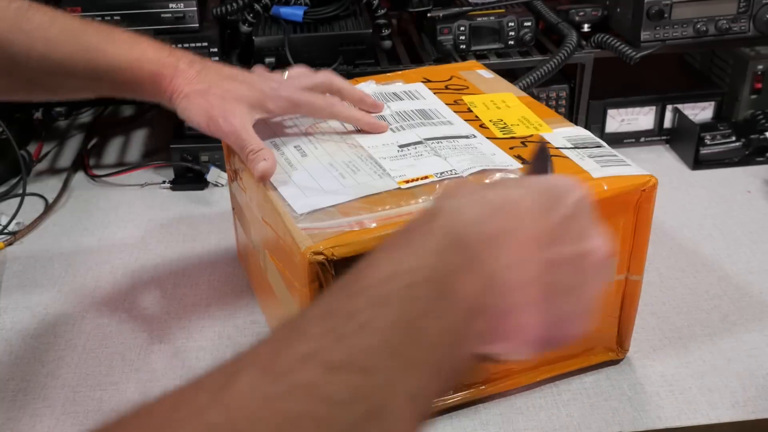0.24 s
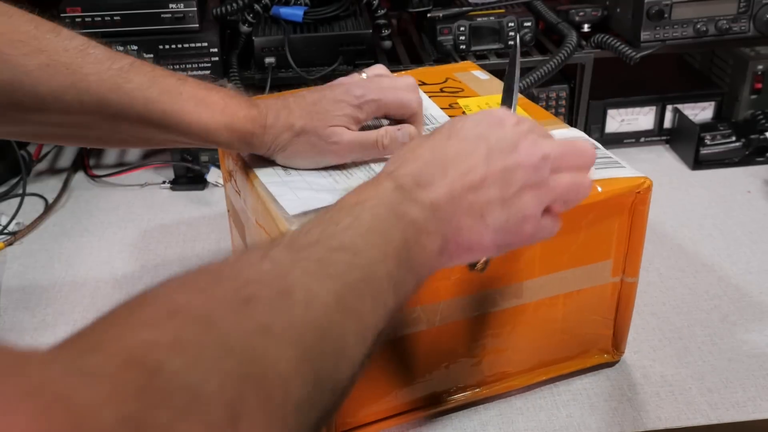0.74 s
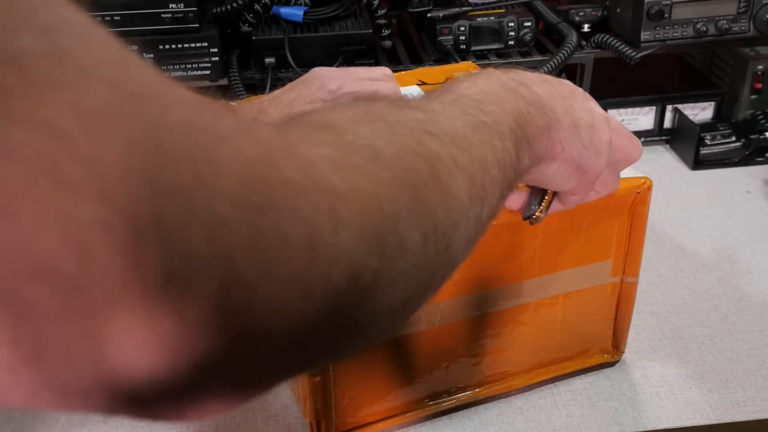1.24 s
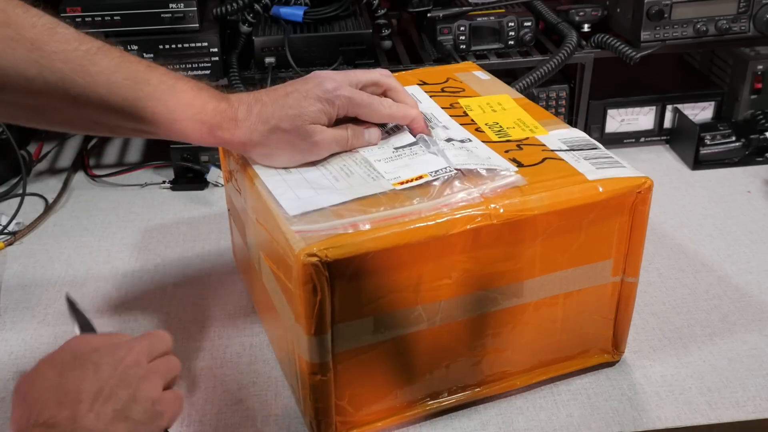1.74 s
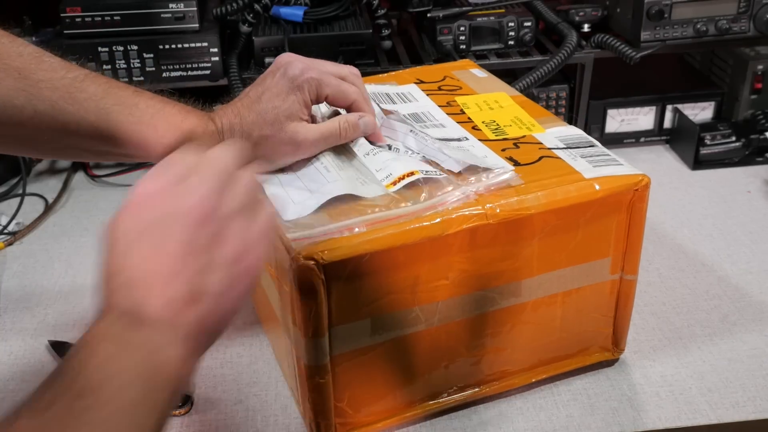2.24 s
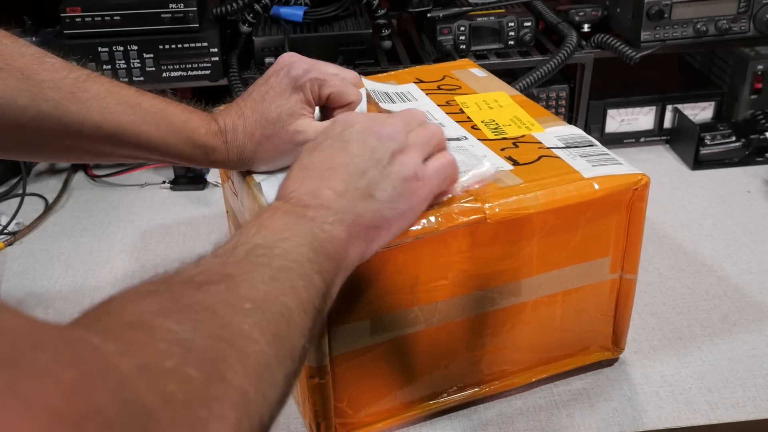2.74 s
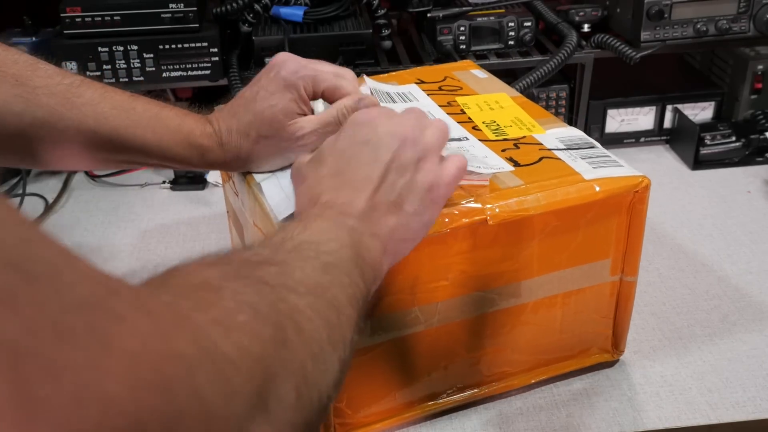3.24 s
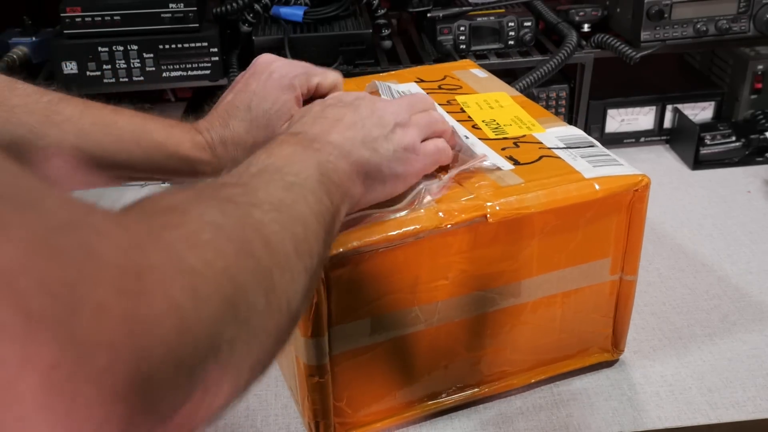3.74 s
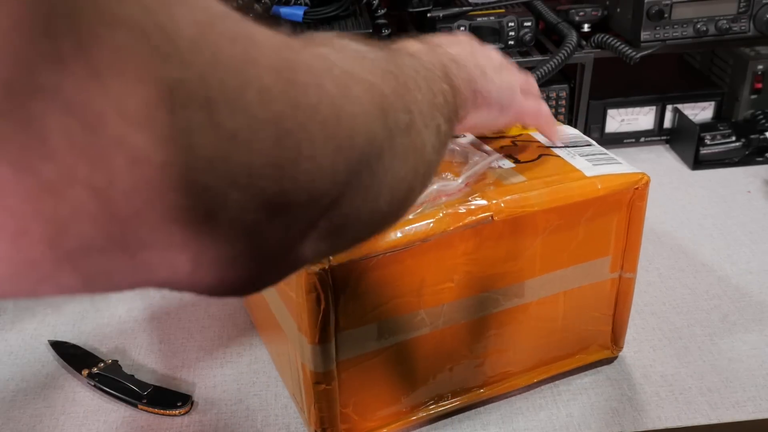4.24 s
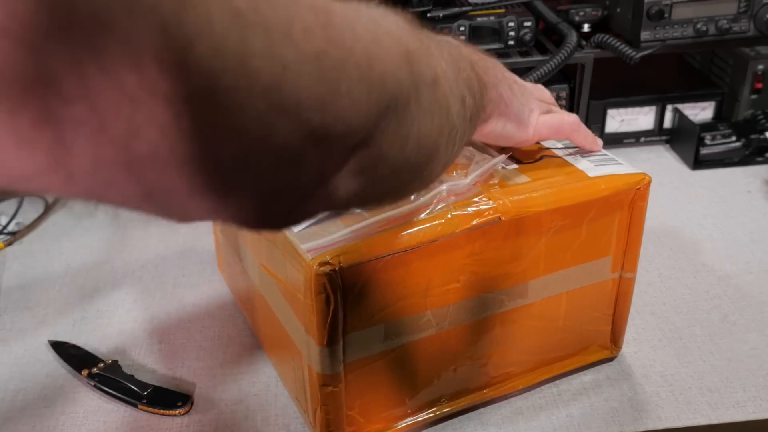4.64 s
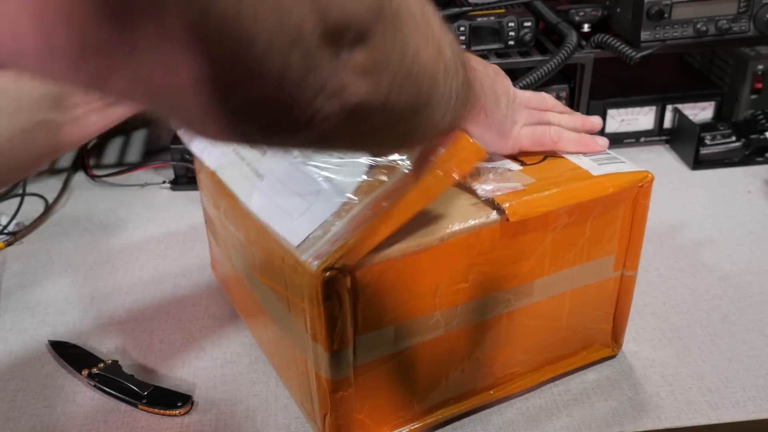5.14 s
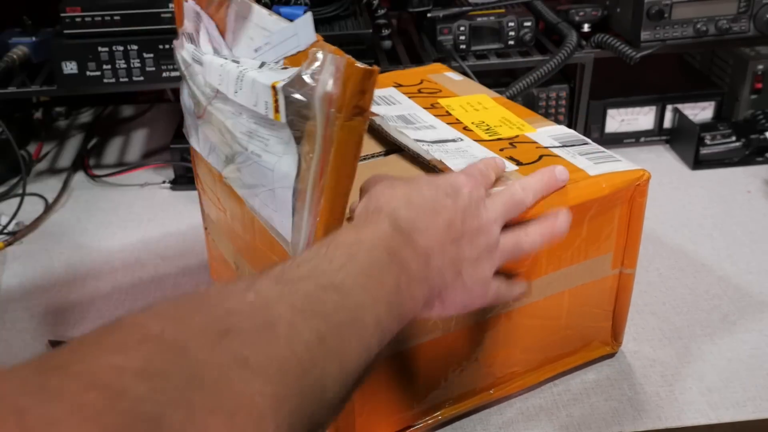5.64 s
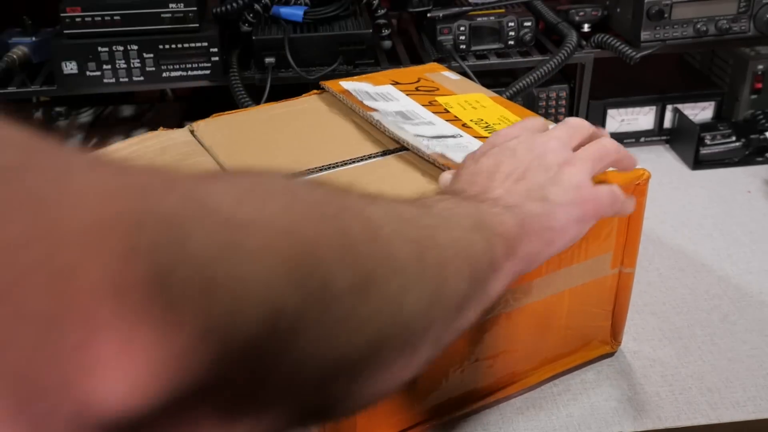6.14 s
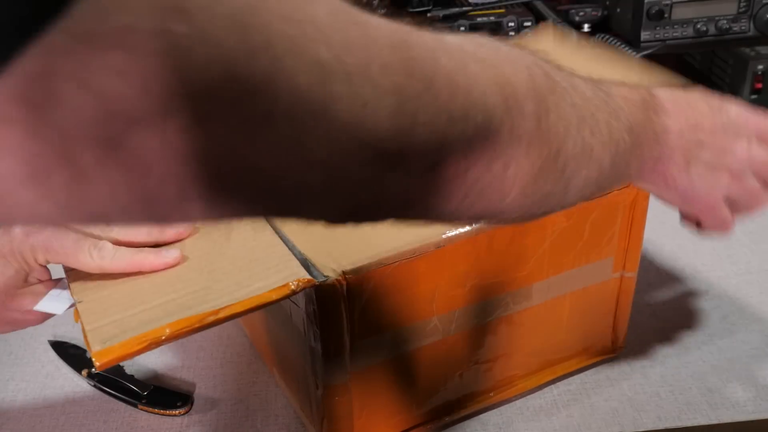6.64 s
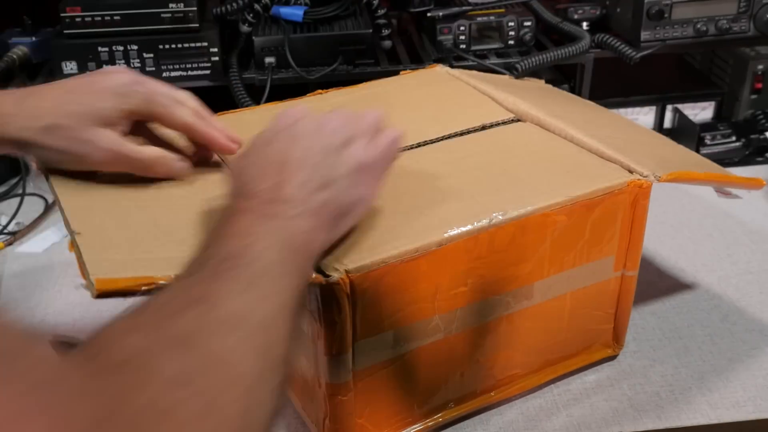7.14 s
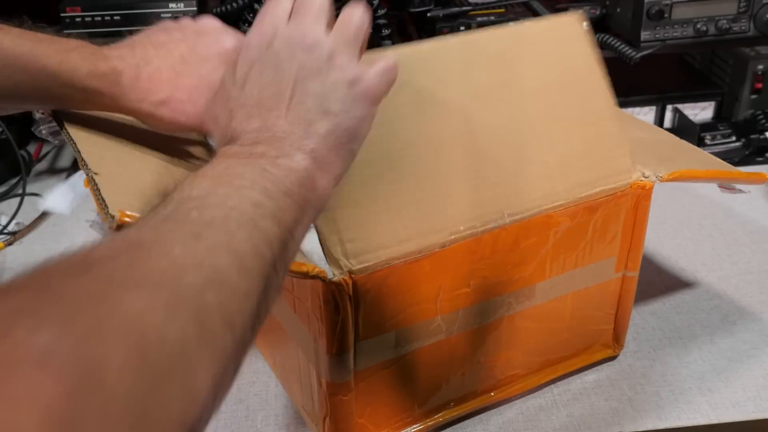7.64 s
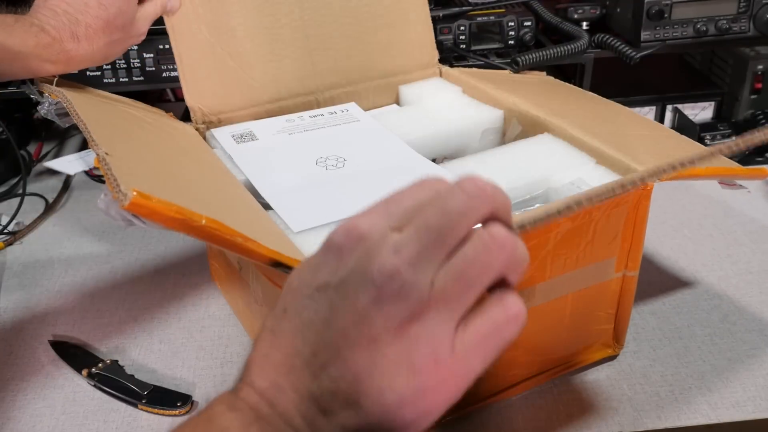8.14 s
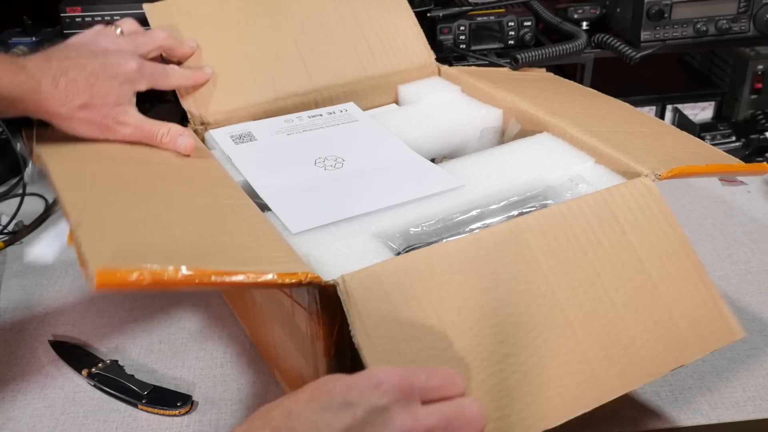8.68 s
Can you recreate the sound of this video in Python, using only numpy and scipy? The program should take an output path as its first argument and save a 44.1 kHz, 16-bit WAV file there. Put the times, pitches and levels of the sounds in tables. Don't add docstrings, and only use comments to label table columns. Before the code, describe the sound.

Over a low wavering fan with faint mains hum, a parcel is slit and pulled apart close to a small camera microphone. Bright plastic pops and dry ticks mix with paper scrapes and boxy knocks. Snaps cluster thickly in the middle, board cracks loudly as the lid rips, then the action eases into smooth film hiss and cardboard rubbing. Small room, short tail.

```python
import sys
import numpy as np
from scipy import signal
from scipy.fft import rfft, irfft, next_fast_len
from scipy.io import wavfile
from scipy.ndimage import uniform_filter1d

SR = 44100
rng = np.random.default_rng(int(sys.argv[2]) if len(sys.argv) > 2 else 0)


def makeup_ratio(level_db):
    decades = np.asarray(level_db, float) / 20
    return 10 ** decades


def materialize(psi):
    bounded = np.clip(np.atleast_2d(psi).T, -1, 1)
    quanta = np.round(bounded * 32767).astype(np.int16)
    wavfile.write(sys.argv[1], SR, quanta)


N = 392921
RISE_DB_S, FALL_DB_S = 697, 307
AFTER_DB_S, AFTER_SLOPE = 380, 0.99


def set_rms(x, db):
    return x * makeup_ratio(db) / np.sqrt(np.mean(x ** 2))


def colour(x, spectrum):
    size = next_fast_len(x.shape[-1])
    hz, db = np.transpose(spectrum)
    bin_hz = np.arange(size // 2 + 1) * SR / size
    gain = makeup_ratio(np.interp(np.log(bin_hz + 1), np.log(hz), db))
    return irfft(rfft(x, size) * gain, size)[..., :x.shape[-1]]


def ring(x, hz, width_hz):
    return signal.lfilter(*signal.iirpeak(min(hz, .45 * SR), hz / width_hz, fs=SR), x)


def modes(push, table, detune):
    total = 0
    for k, (hz, width_hz, db) in enumerate(table):
        total = total + (-1) ** k * makeup_ratio(db) * ring(push, hz * (1 + detune[k]), width_hz)
    return total


def knock(noise, decay_s):
    i = np.arange(len(noise))
    return 2.8 * (i == 0) + 0.42 * noise * np.exp(-i / SR / decay_s)


def swing(t, hz, rise_s, t60_s):
    return (1 - np.exp(-t / rise_s)) * np.exp(-np.log(1000) * t / t60_s) * np.sin(2 * np.pi * hz * t)


def place(out, s, sound, peak_db):
    i = int(s * SR)
    sound = sound[:N - i] * makeup_ratio(peak_db) / np.max(np.abs(sound))
    out[i:i + len(sound)] += sound


def walk(rate_hz):
    k = int(SR / rate_hz)
    held = np.repeat(rng.standard_normal(N // k + 1), k)
    return 1.5 * uniform_filter1d(uniform_filter1d(held, k), k)[:N]


def curve(table):
    s, *columns = np.transpose(table)
    return [np.interp(np.arange(N) / SR, s, column) for column in columns]


def combine(a_db, b_db):
    return 10 * np.log10(makeup_ratio(2 * a_db) + makeup_ratio(2 * b_db))


def strokes(rows, rest_db, rise_db_s, fall_db_s):
    t = np.arange(0, N / SR + .01, .001)
    s, hold_s, db = np.transpose(rows)[:, :, None]
    rising = rise_db_s * np.maximum(s - t, 0)
    falling = fall_db_s * np.maximum(t - s - hold_s, 0)
    power = np.sum(makeup_ratio(2 * (db - rising - falling)), axis=0) + makeup_ratio(2 * rest_db)
    return np.interp(np.arange(N) / SR, t, 10 * np.log10(power))


def settling(s, peak_db, rel_db):
    start, hit_db = np.asarray(s), np.asarray(peak_db)
    rows = np.transpose([start, 0 * start, AFTER_SLOPE * hit_db + rel_db])
    return strokes(rows, -99, 9000, AFTER_DB_S)


def grit(rate_hz, spread_db, flicker_db):
    size_db = spread_db * np.minimum(rng.exponential(size=N), 5)
    slips = (rng.random(N) < rate_hz / SR) * rng.standard_normal(N) * makeup_ratio(size_db)
    return slips * makeup_ratio(flicker_db * walk(40))


def two_ports(x):
    return np.array([x, np.roll(x, 333)])


def rustle(rate_hz, spread_db, flicker_db, spectrum, db):
    return two_ports(set_rms(colour(grit(rate_hz, spread_db, flicker_db), spectrum), 0)) * makeup_ratio(db)


# (frequency [Hz], level [dB])
PORT_WIDTH = [(100, -35), (350, -23.5), (700, -5.5), (1400, -1), (3000, -2.5), (12000, -6)]


def spread(mid, side):
    side = colour(side, PORT_WIDTH)
    return np.array([mid + side, mid - side])


# (frequency [Hz], density [dB per Hz])
FAN_AIR = [(18, -58), (30, -40), (106, -5.5), (245, 6), (512, 0), (844, -5.5), (1600, -21), (3870, -59),
           (7870, -45), (10800, -42), (14800, -78), (16000, -45)]
# (frequency [Hz], rms level [dB])
FAN_LINES = [(116.5, -63), (120, -59.5), (242, -62), (754, -67), (813, -64), (872, -62.5), (928, -70),
             (985, -65), (1163, -66)]


def fan():
    t = np.arange(N) / SR
    air = colour(rng.standard_normal((2, N)), FAN_AIR) * makeup_ratio(walk(5.05))
    lines = 0
    for hz, db in FAN_LINES:
        lines = lines + makeup_ratio(db + walk(2)) * np.sqrt(2) * np.sin(2 * np.pi * (hz * t + rng.random()))
    return set_rms(spread(*air), -52.5) + lines


def room(x, count=12):
    desk_s, desk_db = 0.0033, -2
    t60_s, tail_db = 0.092, -6
    t, step = np.arange(int(.3 * SR)) / SR, N // count + 1
    out = np.zeros((2, N + step + len(t)))
    for i in range(0, N, step):
        tail = rng.standard_normal((2, len(t))) * np.exp(-np.log(1000) * t / t60_s) * (t > desk_s)
        tail = colour(tail, [(150, -7), (800, 5), (4000, 8), (16000, -8)])
        response = spread(*tail) * makeup_ratio(tail_db) / np.sqrt(np.sum(tail[0] ** 2))
        response[:, 0] += 1
        response[:, int(desk_s * SR)] += makeup_ratio(desk_db)
        heard = signal.oaconvolve(x[None, i:i + step], response, axes=1)
        out[:, i:i + heard.shape[1]] += heard
    return out[:, :N]


# (time [s], left minus right [dB])
HAND_PAN = [(0, 1), (3, 0.6), (4, 0), (5.3, 0.5), (5.75, 2), (6.2, 0), (6.8, -1.5), (7.2, 1.5), (7.7, 2),
            (8.91, 2)]


def pan_gain():
    pan_db = curve(HAND_PAN)[0]
    return makeup_ratio([pan_db / 2, -pan_db / 2])


# (time [s], peak [dB], wall [Hz], whole box re peak [dB])
BOX_THUMPS = [(.0522, -16.5, 564, -4.5), (.06, -16.5, 400, -2.5), (.657, -36, 287, 2),
              (.735, -25.5, 315, -7), (0.8043, -14, 319, -9), (1.009, -33, 362, 0), (1.229, -32.5, 286, -3),
              (1.645, -28.5, 266, -4), (1.955, -36, 350, -2), (2.109, -19, 870, -32),
              (2.118, -12.5, 846, -14), (2.181, -13, 927, -30), (1.98, -33, 890, -19),
              (7.458, -35, 400, -3), (3.579, -37, 397, -7), (4.186, -34, 303, -6), (8.248, -39, 450, -3),
              (4.623, -36.5, 400.3, 0.5), (4.949, -25.5, 656, -7), (5.056, -17.5, 682, -10),
              (5.096, -14.5, 396, 3.5), (5.524, -32.5, 350, -0.5), (5.959, -34, 375, 2.5),
              (6.373, -29, 730, -12), (6.373, -24, 1350, -28), (6.741, -38, 1415, -28),
              (6.828, -40, 1660, -30), (7.71, -38, 1287, -30), (3.566, -26, 1246, -30),
              (3.579, -25, 1254, -30), (0.056, -22, 1090, -32), (6.74, -21.5, 460, -27),
              (7.213, -36, 546, -5), (7.305, -35, 360, -15), (7.543, -27, 177, -6),
              (7.541, -26.5, 609, 1.5)]
# (frequency [Hz], width [Hz], gain [dB])
BOX_MODES = [(165, 28, 5), (250, 130, 1.5), (404, 150, 5), (624, 84, 9.5), (654, 320, -5)]


def thumps():
    out, t = np.zeros(N), np.arange(6000) / SR
    for s, db, hz, box_db in BOX_THUMPS:
        noise = rng.standard_normal(6000)
        place(out, s, swing(t, hz, 0.002, 0.073), db - 2)
        place(out, s, modes(knock(noise, 0.0053), BOX_MODES, 0.032 * noise), db + box_db + 4)
    return out


# (time [s], peak [dB], tone [Hz])
FLAP_SLAPS = [(4.978, -27, 300), (5.0595, -14, 750), (5.0868, -6.5, 700), (5.0958, -1.5, 460),
              (5.288, -29, 390), (5.373, -29, 403), (3.787, -38, 494), (2.761, -30, 554),
              (2.795, -30.5, 646), (2.947, -35, 600), (2.991, -31, 660), (3.093, -35, 361),
              (3.284, -34, 375), (3.519, -35, 549), (3.579, -28, 470), (4.011, -38, 400),
              (4.38, -35.5, 430), (4.49, -31, 754), (4.516, -33.5, 440), (6.998, -36, 230),
              (7.03, -35, 560), (7.05, -38, 560), (6.949, -44, 620), (7.247, -39, 400), (7.4, -33, 370),
              (7.412, -33, 360), (7.43, -34, 300), (7.2, -38, 540), (7.32, -34, 400), (.8035, -16.5, 496),
              (0.82, -31, 730), (6.374, -23, 1180), (7.542, -33, 1320), (3.053, -36, 310),
              (3.166, -38, 350), (3.108, -31, 1200), (4.9815, -23.5, 520)]


def slaps():
    out, t = np.zeros(N), np.arange(3000) / SR
    for s, db, hz in FLAP_SLAPS:
        place(out, s, swing(t, hz, 0.00067, 0.018), db)
    return out


# (start [s], hold [s], level [dB])
PALM_PRESSES = [
    (1.94, 0.077, -49),
    (2.2, 0.13, -35.5),
    (5.3, 0.078, -41.5),
    (6.65, .2, -58),
    (6.96, 0.1, -48),
    (7.2, .03, -51),
    (7.4, 0.045, -47),
    (7.66, .08, -49),
]
# (frequency [Hz], density [dB per Hz])
BOX_DRONE = [(100, -6.5), (200, 1), (400, 5), (900, -0.5), (1300, -5.5), (2000, -11.5), (3500, -16.5),
             (6000, -47)]


def body(paper_db):
    pressed = strokes(PALM_PRESSES, -51.5, RISE_DB_S, FALL_DB_S)
    s, peak_db, _, _ = np.transpose(BOX_THUMPS)
    shaken = settling(s, peak_db, -14.5)
    return rustle(5000, 1, 1, BOX_DRONE, combine(combine(pressed, shaken), paper_db - 7))


# (start [s], hold [s], level [dB])
FLAP_SCUFFS = [
    (5.83, 0.04, -40),
    (6.27, 0.048, -44.5),
    (6.82, 0.024, -53),
    (5.3, 0.041, -44),
    (7.69, 0.047, -41),
    (5.9, 0.01, -50),
    (1.9, 0.05, -53),
]
# (frequency [Hz], density [dB per Hz])
SCUFF_SPECTRUM = [(350, -30), (600, -18), (1400, -0.5), (2300, -6.5), (4500, -9.5)]


def scuffs():
    return rustle(5000, 1.5, 2, SCUFF_SPECTRUM, strokes(FLAP_SCUFFS, -99, RISE_DB_S, FALL_DB_S))


# (start [s], hold [s], film [dB], paper re film [dB])
POUCH_PEELS = [(0, 0.033, -51, 0.5), (0.253, 0.032, -48.5, -6.5), (0.29, 0.04, -64, -2.5),
               (0.556, 0.027, -64, -4), (0.63, 0.029, -48, -9), (0.707, 0.023, -46.5, -0.5),
               (0.777, 0.08, -44.5, 4.5), (0.978, 0.092, -54.5, 6.5), (1.106, .16, -51, -4),
               (1.379, 0.029, -49, -6), (1.444, .08, -61, 3), (1.569, 0.033, -55.5, 1),
               (1.654, 0.011, -42, 5.5), (1.69, .05, -58, -10), (1.76, 0.17, -61, 0.5),
               (1.947, 0.037, -53.5, 6.5), (2.047, .03, -51, 1), (2.34, 0.075, -55.5, 5),
               (2.45, 0.098, -58, 3), (2.577, 0.098, -49.5, 1.5), (2.684, 0.088, -40, -5),
               (2.8, 0.11, -46.5, -4), (2.95, 0.15, -44.5, 1), (3.285, 0.071, -38.5, -2),
               (3.15, 0.045, -53, -3), (3.363, 0.109, -44, -1.5), (3.637, 0.082, -49.5, -2),
               (3.773, 0.026, -35.5, -10.5), (3.863, 0.042, -37.5, -0.5), (3.954, 0.18, -48.5, 0),
               (4.163, 0.039, -40.5, 2.5), (4.31, 0.015, -51.5, 2.5), (4.379, 0.016, -52, 7),
               (4.48, 0.075, -57, 6), (4.617, 0.049, -48.5, 1.5), (4.69, .05, -57, 5),
               (4.751, 0.09, -46.5, -1), (4.863, 0.063, -51, -4)]
# (start [s], hold [s], film [dB], paper re film [dB])
FLAP_SLIDES = [(4.947, 0.041, -39.5, 9.5), (5.045, 0.11, -41, 8.5), (5.102, 0.051, -44, 3),
               (5.21, 0.1, -53, 9.5), (5.344, 0.023, -39.5, 3), (5.443, 0.089, -50, -0.5),
               (5.578, 0.091, -45.5, 2.5), (5.64, 0.19, -37.5, -13), (5.83, 0.017, -29.5, -15),
               (5.883, 0.088, -40, -5), (6.016, 0.07, -43.5, -5.5), (6.088, 0.068, -49.5, -3),
               (6.163, 0.058, -50.5, 1), (6.53, 0.055, -52, -3), (6.86, 0.08, -57, -1),
               (6.321, 0.016, -37, 0.5), (6.456, 0.061, -43, 0), (6.599, 0.089, -37.5, -7),
               (6.72, 0.048, -42.5, -4), (6.824, 0.016, -48.5, 8), (6.946, 0.08, -41, -3.5),
               (7.106, 0.033, -42, -20), (7.174, 0.12, -36.5, -15), (7.335, 0.11, -43, -7.5),
               (7.473, 0.096, -53, 0), (7.6, 0.068, -50.5, 1), (7.713, 0.044, -41, -8),
               (7.78, 0.055, -52, -3), (7.859, 0.075, -42.5, -10), (7.954, 0.14, -48.5, -6.5),
               (8.172, 0.098, -49.5, -1), (8.308, 0.015, -39.5, -17), (8.377, 0.014, -40.5, -15),
               (8.43, 0.18, -41, -14), (8.664, 0.029, -47.5, -4), (8.772, 0.13, -46, -6.5)]


def hands():
    s, hold_s, film_db, paper_rel_db = np.transpose(POUCH_PEELS + FLAP_SLIDES)
    snap_s, peak_db, _, _, film_after_db, paper_after_db = np.transpose(releases())
    film_rows = np.transpose([s, hold_s, film_db])
    paper_rows = np.transpose([s, hold_s, film_db + paper_rel_db])
    film = strokes(film_rows, -62, RISE_DB_S, FALL_DB_S)
    paper = strokes(paper_rows, -60, RISE_DB_S, FALL_DB_S)
    film = combine(film, settling(snap_s, peak_db, film_after_db))
    paper = combine(paper, settling(snap_s, peak_db, paper_after_db))
    return film, paper


def crackle(film_db, paper_db):
    pouch_off_s, creases_from_db = 5.55, -55
    low = ring(grit(350, 1.8, 5), 2800, 2500)
    high = ring(grit(350, 1.8, 5), 9000, 8000)
    held = np.arange(N) / SR < pouch_off_s
    force = makeup_ratio(2 * np.minimum(paper_db - creases_from_db, 0))
    paper = (set_rms(low, -6.5) + set_rms(high, -11.5)) * makeup_ratio(np.minimum(paper_db, -40))
    film = set_rms(high, -28) * makeup_ratio(np.minimum(film_db, -40))
    return held * force * (paper + film)


# (frequency [Hz], density [dB per Hz])
FILM_SPECTRUM = [(1760, -18), (3000, -13), (6810, -6.5), (7800, -8), (12100, -2.5), (15200, -1),
                 (16000, -25), (16500, -62)]
# (time [s], level [dB], hiss re level [dB])
KNIFE_CLATTER = [
    (2.086, -47, -8),
    (2.091, -23, -8),
    (2.124, -12, -8.5),
    (2.142, -15.5, -3.5),
    (2.176, -19.5, -11),
    (2.184, -12.5, -3.5),
    (2.22, -19, -19),
    (2.27, -23, -5),
    (2.35, -57, -27),
]
# (frequency [Hz], density [dB per Hz])
CLATTER_SPECTRUM = [(80, -55), (150, -25), (330, -6.5), (700, -2.5), (950, -6.5), (1300, -8.5), (5000, -21),
                    (7000, -48)]
# (frequency [Hz], width [Hz], level re clatter [dB])
LID_KNIFE_MODES = [(450, 240, -8), (880, 240, 1), (2200, 700, -14), (4100, 500, -15), (8500, 400, -16),
                   (11050, 220, -8)]


def clatter():
    clatter_db, hiss_db = curve(KNIFE_CLATTER)
    t = np.arange(N) / SR
    clatter_db = np.where((t > KNIFE_CLATTER[0][0]) & (t < KNIFE_CLATTER[-1][0]), clatter_db, -120)
    push = grit(6000, 1.6, 1.2)
    rings = 0
    for hz, width_hz, db in LID_KNIFE_MODES:
        rings = rings + set_rms(ring(ring(push, hz, width_hz), hz, 2 * width_hz), db)
    rattle = rustle(6000, 1.6, 1.2, CLATTER_SPECTRUM, clatter_db - 3)
    hiss = rustle(12000, 1.5, 2, FILM_SPECTRUM, clatter_db + hiss_db)
    return rattle + hiss + two_ports(rings * makeup_ratio(clatter_db - 7.5))


# (frequency [Hz], density [dB per Hz])
PAPER_SPECTRUM = [(600, -30), (1200, -1.5), (2500, -5.5), (4200, -4.5), (7000, -7.5)]


def rubbing(film_db, paper_db):
    film = rustle(14000, 1.5, 1.6, FILM_SPECTRUM, film_db)
    paper = rustle(4500, 2.6, 2, PAPER_SPECTRUM, paper_db)
    return spread(*(film + paper + clatter() + scuffs() + body(paper_db)))


# (time [s], peak [dB], brightest [Hz])
FILM_POPS = [(0.2808, -11.5, 7900), (0.5516, -28, 11000), (0.655, -21.5, 9600), (0.8340, 0, 6340),
             (2.049, -22, 9300), (2.3491, -15, 7800), (2.6685, -2.5, 11500), (2.6915, -12, 7000),
             (2.751, 1, 11000), (2.7644, -2.5, 4500), (2.7958, 4, 6180), (2.8537, -9, 9700),
             (3.357, -11.5, 8900), (3.4732, 1, 10600), (3.491, 2.5, 10700), (3.578, -3.5, 2200),
             (3.7471, -11.5, 8900), (4.082, -14.5, 6130), (5.2584, -8.5, 10600), (5.516, -12, 10000),
             (5.8207, -42, 3320), (6.411, -11, 6300), (6.611, -19, 7560), (6.7146, -14.5, 11100),
             (6.942, -19, 10400), (7.8594, -19.5, 3900), (8.251, -15, 8500), (8.716, -19.5, 4900),
             (8.828, -24, 9500)]
# (time [s], peak [dB], brightest [Hz])
TAPE_SNAPS = [(0.809, -12.5, 5900), (.91, -12, 3200), (1.405, -23.5, 11300), (1.6487, -12.5, 4600),
              (1.8341, -29.5, 8700), (2.0742, -19.5, 5170), (2.655, -22, 10000), (2.6649, -10.5, 8100),
              (2.9407, -21, 7700), (3.0931, -18.5, 6900), (3.1081, -14, 4000), (3.2241, -9.5, 4100),
              (3.2902, -25, 7200), (3.4674, -15, 7140), (3.5195, 1.5, 6470), (3.5293, -5, 6000),
              (3.5643, 3, 2640), (3.5964, -7, 2970), (3.876, -21, 4000), (4.205, -16, 5100),
              (4.651, -19.5, 6700), (4.6706, -37, 5300), (4.812, -20, 3850), (4.9384, -15, 2500),
              (4.9856, -9, 9100), (5.054, -6, 2800), (5.174, -18, 7340), (5.524, -9, 8400),
              (6.463, -12.5, 5950)]
# (time [s], peak [dB], brightest [Hz])
BOARD_CRACKS = [(0.0547, -1.5, 2340), (.332, -29.5, 3000), (0.766, -29, 9250), (0.7858, -15, 9000),
                (1.0278, -26, 3180), (2.0903, -12.5, 2530), (2.1815, -4.5, 1900), (2.229, -17, 3500),
                (2.262, -21, 7650), (2.9339, -20, 4460), (3.3113, -24, 3000), (3.3184, -26, 7200),
                (4.018, -27.5, 4400), (4.3755, -27.5, 3020), (4.49, -25, 1620), (4.514, -25.5, 1850),
                (4.553, -22.5, 2170), (4.6268, -21.5, 4830), (4.778, -35, 2000), (4.953, -15, 2300),
                (4.9696, -18.5, 5500), (5.0600, -2.5, 2300), (5.089, -5.5, 8250), (5.0955, -1.5, 2900),
                (5.2516, -19.5, 2300), (5.8395, -11.5, 2100), (6.3741, -4, 2500), (6.8169, -22, 4240),
                (7.54, -19, 6000)]
# (time [s], peak [dB], brightest [Hz])
FILM_TICKS = [(0.243, -40, 5060), (0.506, -35, 6000), (.6301, -38, 10700), (.7025, -27, 9000),
              (.9798, -41, 3970), (1.107, -25, 10000), (1.1784, -33, 9000), (1.2128, -33, 11900),
              (1.5535, -37, 9000), (1.6274, -31, 2910), (6.528, -35, 2500), (6.5743, -29, 9100),
              (7.6656, -41, 1400), (7.6956, -37, 1310), (8.669, -43, 1200), (1.9228, -32, 9700),
              (1.9736, -23.5, 2920), (2.0265, -31, 4250), (2.06, -17.5, 8740), (2.1108, -6, 1900),
              (2.159, -6, 10900), (2.252, -13, 9000), (2.375, -32, 2070), (2.4221, -40, 6200),
              (2.4481, -31, 8000), (3.0513, -30, 5830), (3.7815, -27, 3190), (3.798, -20.5, 4000),
              (3.83, -26, 4000), (3.854, -19, 9360), (3.897, -20, 4500), (3.911, -22, 6470),
              (4.1328, -26, 3960), (4.161, -36, 2020), (4.18, -25, 4000), (4.259, -30, 3370),
              (4.311, -25.5, 5320), (4.355, -39, 2010), (4.3863, -22, 6020), (4.41, -39, 2500),
              (4.568, -25.5, 2500), (4.607, -25, 10000), (4.7427, -29, 6000), (4.776, -21.5, 2600),
              (4.796, -28, 2980), (4.871, -37, 2660), (4.891, -26, 9000), (4.923, -23, 2610),
              (4.9792, -12, 2300), (5.033, -24, 1850), (5.05, -16, 1280), (5.3465, -33, 1790),
              (5.363, -28, 3000), (5.4261, -33, 2980), (5.492, -42, 3210), (5.5887, -33, 4370),
              (5.6356, -21.5, 5000), (5.8074, -36, 2000), (5.8194, -17.5, 2300), (5.8300, -20, 2000)]
# (time [s], peak [dB], brightest [Hz])
MORE_TICKS = [(2.1167, -6.5, 1850), (2.1605, -11, 2100), (2.097, -11, 2000), (2.134, -13, 4500),
              (2.188, -13, 2000), (2.227, -14, 1400), (3.5659, 1, 3800), (3.5803, -7, 4400),
              (3.583, -13, 4000), (3.5995, -9, 4500), (2.6, -25, 3000), (3.105, -15.5, 3500),
              (3.0945, -18, 5000), (3.5335, -11, 4000), (3.539, -15, 3500), (3.543, -22, 4000),
              (3.4765, -11.5, 4600), (3.5005, -14, 6200), (5.064, -13, 3400), (5.068, -20, 2600),
              (5.0995, -13, 2900), (4.9815, -17, 3800), (5.8425, -14.5, 2950), (4.6, -30, 2000),
              (.0525, -17, 2000)]
# (board ring [dB], film rustle after [dB], paper rustle after [dB])
SNAP_KINDS = [
    (-22.5, -21.5, -48),
    (-12.5, -18.5, -28),
    (-4, -15, -21),
    (-16, -27, -24.5),
]


def releases():
    groups = (FILM_POPS, TAPE_SNAPS, BOARD_CRACKS, FILM_TICKS + MORE_TICKS)
    return [row + kind for rows, kind in zip(groups, SNAP_KINDS) for row in rows]


# (frequency [Hz], width [Hz], gain [dB])
BOARD_MODES = [(890, 1870, 3), (1335, 163, 13.5), (1485, 240, 7.5), (1945, 620, 9), (2500, 790, 0)]


def snaps():
    out, t = np.zeros(N), np.arange(1500) / SR
    for s, db, hz, board_db, _, _ in releases():
        a, b = rng.standard_normal((2, 1500))
        fade = np.exp(-t * hz / 1.8)
        after_slips = makeup_ratio(-28) * np.exp(-t / 0.005) * np.minimum(b ** 2, 4)
        burst = 3 * (t == 0) + a * (fade + after_slips)
        treble = 1.34 * (hz / 10000) ** 1.4 * ring(burst, 12600, 5000)
        place(out, s, ring(burst, hz, 0.74 * hz) + treble, db)
        place(out, s, modes(knock(b, 0.0006), BOARD_MODES, 0.067 * a), db + board_db - 4)
    return out


def scene():
    film_db, paper_db = hands()
    sharp = room(snaps() + crackle(film_db, paper_db))
    worked = (sharp + rubbing(film_db, paper_db)) * pan_gain()
    return worked + thumps() + slaps() + fan()


def low_pass(x):
    return signal.sosfilt(signal.butter(12, 16640, fs=SR, output="sos"), x)


# (frequency [Hz], gain [dB])
MIC_RESPONSE = [(60, -17), (100, -2.5), (150, 1), (6000, -2), (11000, 1), (15000, -10), (16300, -31),
                (16700, -70)]


def record(dry):
    x = colour(dry - .6 * ring(dry, 7900, 350), MIC_RESPONSE)
    keep = np.exp(-1 / (.22 * SR))
    power = signal.lfilter([1 - keep], [1, -keep], np.mean(x ** 2, axis=0))
    x = x * (1 + power / makeup_ratio(-55.5)) ** -.23
    return low_pass(np.tanh(1.092 * x) / 1.07)


dry = scene()
out = record(dry)
materialize(out)
```